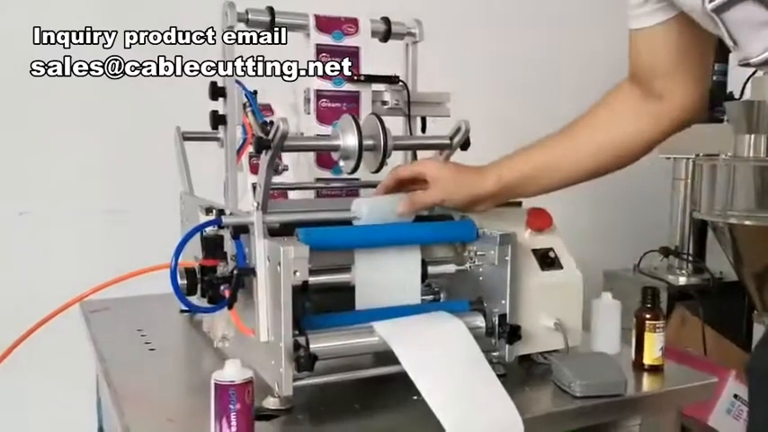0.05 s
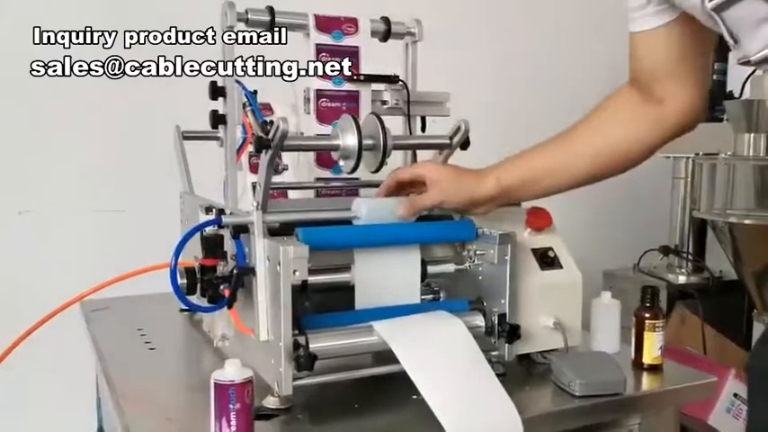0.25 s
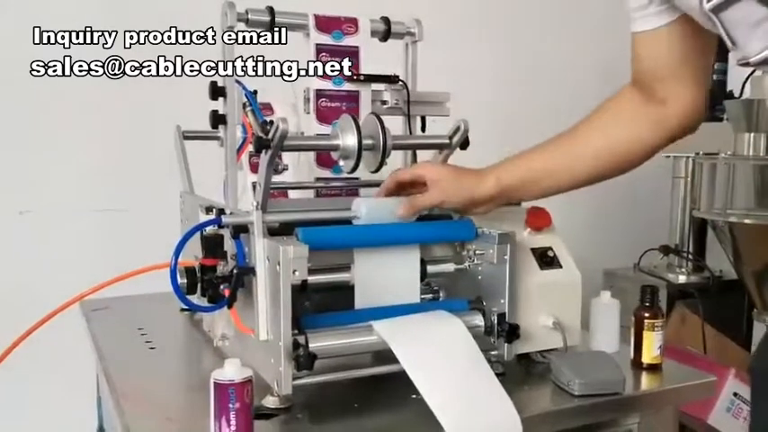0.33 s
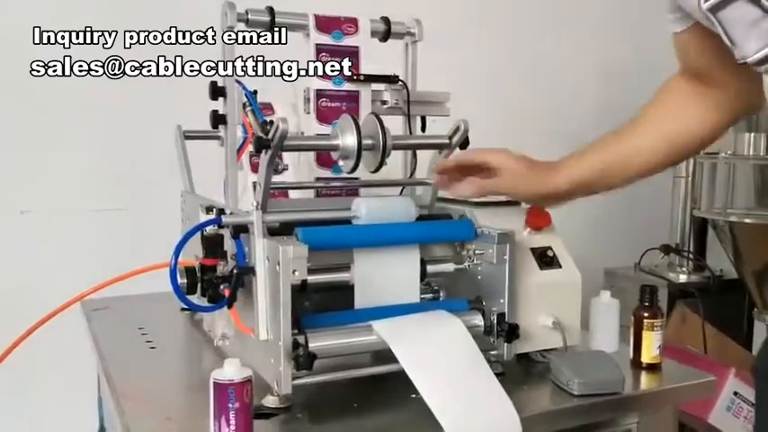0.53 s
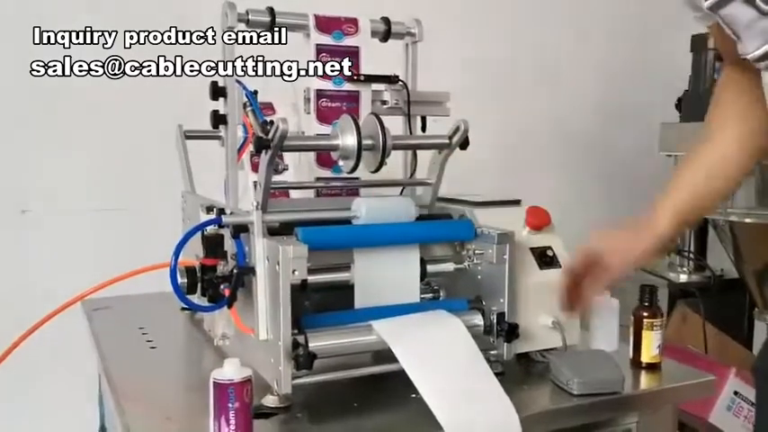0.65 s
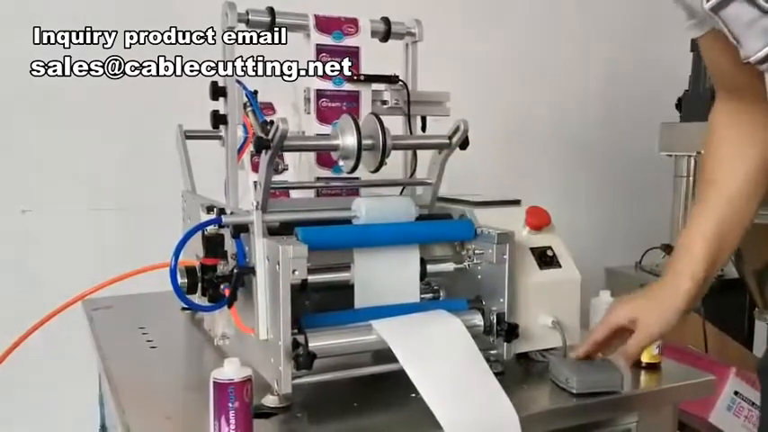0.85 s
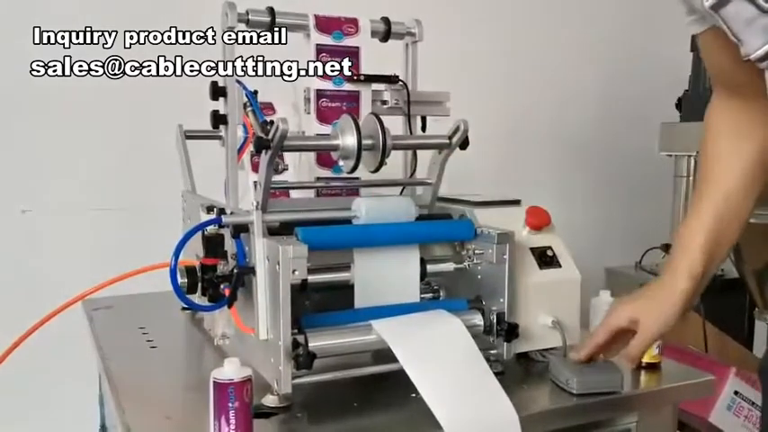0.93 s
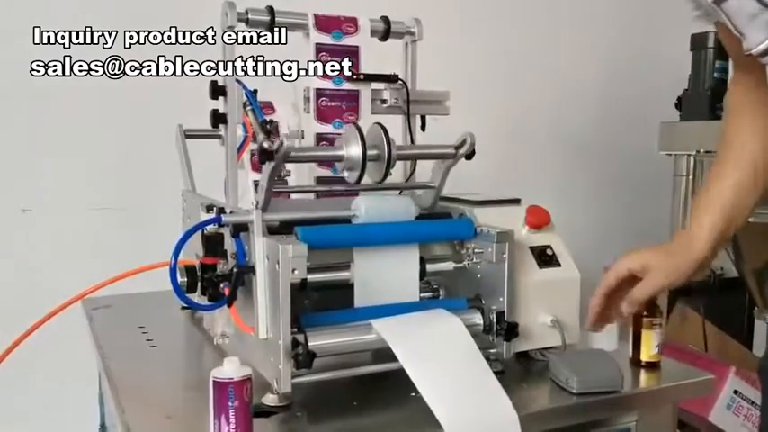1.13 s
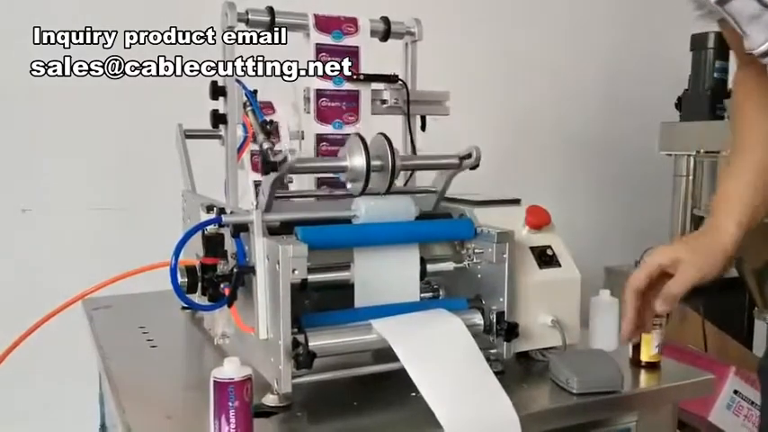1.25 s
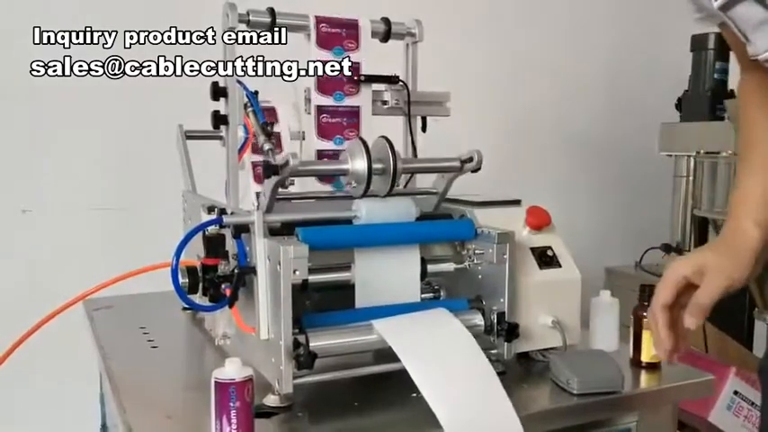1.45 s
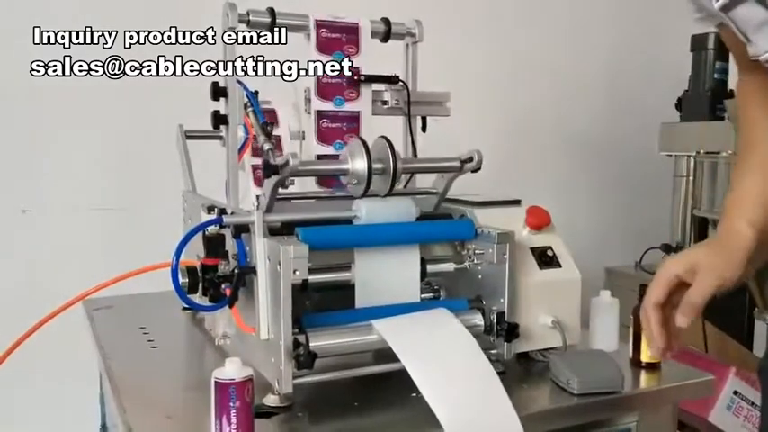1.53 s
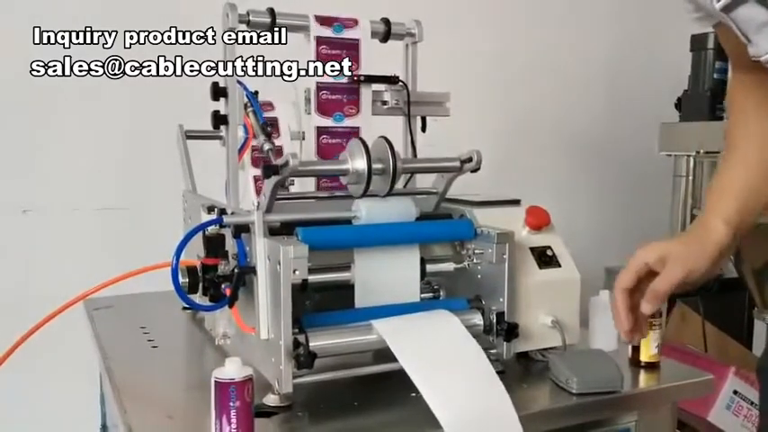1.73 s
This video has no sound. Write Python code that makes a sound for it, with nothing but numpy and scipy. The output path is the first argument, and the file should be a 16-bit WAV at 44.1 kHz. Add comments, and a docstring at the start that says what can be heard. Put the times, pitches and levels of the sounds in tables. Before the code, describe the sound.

A pneumatic tabletop labelling machine runs one cycle in a reverberant workshop with low, uneven motor hum. At about 0.2 s a switch ticks and a valve snaps, then air rushes in with a faint wavering note. At 0.43 s a latch double-ticks and exhaust hisses; at 0.47 s the arm clacks loudly, with ringing steel and dull rattle. Softer hiss fades from 0.7 s, ending in a hollow bump and puff near 1.2 s.

```python
"""An air-driven tabletop labelling machine in a hard-walled workshop, over room noise and an uneven motor hum.
A switch ticks (damped modes), a valve snaps over (modes and noise cracks) and air fills the cylinder (shaped
noise and a wavering note). Exhaust air hisses as the latch ticks; the arm clacks against its stop, and the
steel frame and table ring and rattle. A softer hiss follows and fades, with a hollow bump and a last puff."""
import sys
import numpy as np
from scipy import signal
from scipy.fft import rfft, irfft, next_fast_len
from scipy.io import wavfile
from scipy.ndimage import map_coordinates

SR = 44100
rng = np.random.default_rng(int(sys.argv[2]) if len(sys.argv) > 2 else 0)


def master_out(mix):
    """Clip the mix to full scale and print it as 16-bit PCM to the path in sys.argv[1]."""
    frames = np.transpose(np.atleast_2d(mix))
    ceiling = np.clip(frames, -1, 1)
    pcm = np.round(ceiling * 32767).astype(np.int16)
    wavfile.write(sys.argv[1], SR, pcm)


N = 79380  # samples

CROSSOVER_HZ = 800  # stereo differences and spectral ripple grow in gradually around here
FILL_START_S = 0.19  # air enters the cylinder


def amp(db):
    """A level in decibels is 20 times the logarithm of the amplitude ratio."""
    return 10 ** (np.asarray(db) / 20)


def unit(x):
    """Dividing by the root mean square gives a signal of rms 1."""
    return x / np.sqrt(np.mean(x ** 2) + 1e-20)


def along(points, hz):
    """(Hz, value) points are joined on a logarithmic frequency axis, close to the ear's pitch scale."""
    point_hz, value = np.transpose(points)
    return np.interp(np.log(hz + 1), np.log(point_hz + 1), value)


def since(start):
    """Seconds elapsed since start, held at zero before it."""
    return np.maximum(np.arange(N) / SR - start, 0)


def fade(t, t60):
    """Damping proportional to velocity gives an exponential decay: 60 dB in t60 seconds."""
    return np.exp(-np.log(1000) * t / np.maximum(t60, 1e-4))


def level(rows):
    """A slow level curve: gain per sample from (time [s], level [dB]) points."""
    return amp(np.interp(since(0), *np.transpose(rows)))


def pan(db):
    """Interchannel level difference: half is added on the left and half taken from the right."""
    return amp(np.array([db / 2, -db / 2])).reshape(2, -1)


def filtered(x, response):
    """Linear filtering: the spectrum of x is multiplied by a frequency response."""
    size = next_fast_len(N + SR // 2)
    return irfft(rfft(x, size) * response(np.fft.rfftfreq(size, 1 / SR)), size)[..., :N]


def noise(gain):
    """Partial coherence: independent mid and side noises, coloured by gain(Hz), set how alike the channels are."""
    # correlation of left and right: (frequency [Hz], correlation [1])
    coherence = [(60, .9988), (170, 1), (350, 0.99), (700, 0.94), (1300, 0.82), (2400, 0.53), (4500, 0.22),
                 (7000, 1), (8500, 0.78)]

    def mid_side_response(hz):
        angle = np.arccos(np.clip(along(coherence, hz), -1, 1)) / 2
        return gain(hz) * np.array([np.cos(angle), np.sin(angle)])

    mid, side = filtered(rng.standard_normal((2, N)), mid_side_response)
    return np.array([mid + side, mid - side])


def rush(colour):
    """Turbulence as stereo noise of rms 1, its (Hz, dB) spectrum rippled as by reflections off nearby plates."""
    ripple_db, ripple_step_hz = 4, 59.27
    knots = rng.standard_normal(1024)

    def gain(hz):
        ripple = map_coordinates(knots, [hz / ripple_step_hz], order=1, mode="wrap")
        return amp(along(colour, hz) + ripple_db * ripple * hz / (hz + CROSSOVER_HZ))

    return unit(noise(gain))


def hollow(centre_hz, width_hz):
    """A single resonance: stereo noise of rms 1 with a bell-shaped peak."""
    return unit(noise(lambda hz: 1 / (1 + ((hz - centre_hz) / width_hz) ** 2)))


def wobble(rate):
    """Slow random modulation: a smooth curve through rate random knots a second."""
    return map_coordinates(rng.standard_normal(512), [since(0) * rate], mode="wrap")


def ring(start, modes, fall_s=None):
    """Modal superposition: damped sines with wandering phase; pitch may sink, halving after fall_s."""
    attack_s, wander_rate, wander_rad = .0004, 43.8, 0.79  # rate in knots a second
    t, out = since(start), np.zeros(N)
    # the slope of this warped time falls to one half at fall_s
    warped_t = t if fall_s is None else fall_s * np.arctan(t / fall_s)
    for hz, db, t60 in modes:
        wander = map_coordinates(rng.standard_normal(512), [t * wander_rate], mode="wrap")
        phase = 2 * np.pi * hz * warped_t + wander_rad * (wander - wander[0])
        mode_db = db + rng.normal()  # each mode's level scatters by about 1 dB
        out += amp(mode_db) * fade(t, t60) * np.sin(phase)
    return out * (1 - np.exp(-t / attack_s))


def room(x):
    """Reverberation: convolution with a noise tail that decays at its own rate in each frequency band."""
    # reverberation time: (frequency [Hz], t60 [s])
    echo_t60 = [(200, 0.75), (2000, 0.88), (5000, 0.38), (9000, 0.62)]
    hz, t, bands = signal.stft(noise(np.ones_like)[:, :SR], SR, nperseg=256)
    decaying = bands * fade(t, along(echo_t60, hz)[:, None])
    tail = signal.istft(decaying, SR, nperseg=256)[1]
    return signal.fftconvolve(x, tail / np.linalg.norm(tail[0]), axes=1)[:, :N]


def contacts(hits, modes, pan_db):
    """Impact excitation: each metal contact gives a broadband crack, a brief modal ring and an echo."""
    # crack spectrum: (frequency [Hz], density [dB per Hz])
    crack_colour = [(300, -16), (900, -5), (1500, -14), (2500, -5), (5000, 3), (7500, -0.5), (9000, -7.5)]
    crack_t60, echo_db = 0.0096, 0
    out = np.zeros((2, N))
    for start, ring_db, crack_db in hits:
        t = since(start)
        crack = unit(noise(lambda hz: amp(along(crack_colour, hz))))
        crack = crack * (t > 0) * fade(t, crack_t60)
        out += amp(ring_db) * ring(start, modes) + amp(crack_db) * crack
    mono = out.mean(axis=0, keepdims=True)
    return out * pan(pan_db) + amp(echo_db) * room(mono)


def flow(start, end, attack, db, sag, release):
    """Pressure-driven flow: a linear opening, a steady change in dB (negative sag rises), decay after end."""
    t = since(start)
    opening = np.minimum(t / max(attack, 1e-4), 1)  # attacks below 0.1 ms, even negative, take 0.1 ms
    return amp(db - sag * t) * opening * fade(since(end), release)


def workshop():
    """Stationary broadband noise, and a low motor hum as a sine under a swelling and ebbing level."""
    # room noise spectrum: (frequency [Hz], density [dB per Hz])
    floor_colour = [(20, 1), (33, -0.5), (75, 2), (115, 5), (160, 2), (350, -1.5), (520, -3.5), (760, -0.5),
                    (1150, -8.5), (1500, -4), (1900, -8.5), (2800, -7.5), (3700, -19.5), (4700, -25.5),
                    (6200, -26.5), (7300, -20.5), (8100, -29.5), (8700, -34)]
    # room noise and hum levels: (time [s], level [dB])
    floor_level = [(0, -53.5), (.3, -51.5), (.8, -50.5), (1.3, -51), (1.8, -51.5)]
    hum_level = [(0, -54), (.13, -74.5), (.39, -50.5), (.55, -81), (.67, -47.5), (.79, -48), (.87, -77),
                 (1.17, -52.5), (1.4, -61.5), (1.65, -51.5), (1.74, -72), (1.8, -59)]
    hum_hz = 49.3
    hum = np.sqrt(2) * np.sin(2 * np.pi * hum_hz * since(0))
    return level(floor_level) * rush(floor_colour) + level(hum_level) * hum


def switch():
    """Free vibration: the switch ticks as a set of mostly short damped modes, towards the right."""
    # ring of the switch: (frequency [Hz], level [dB], t60 [s])
    tick_modes = [(5320, -0.5, 0.026), (5240, -7, 0.0079), (6400, -6, 0.014), (7860, -22, 0.11),
                  (3010, -16, 0.087)]
    start_s, level_db, pan_db = .1855, -30.5, -5.5  # pan is left minus right
    return amp(level_db) * ring(start_s, tick_modes) * pan(pan_db)


def valve():
    """Impact and resonance: the valve body rings as its spool snaps over in three contacts."""
    # ring of the valve body, then of the spool: (frequency [Hz], level [dB], t60 [s])
    body_modes = [(1034, 1, 0.1), (2110, -14.5, 0.16), (2280, -3.5, 0.13), (2480, -16.5, 0.15),
                  (3160, 2, 0.049)]
    spool_modes = [(2310, -9, 0.021), (2470, -2.5, 0.019), (4306, 3.5, 0.013), (5380, 1.5, .018),
                   (6090, -6.5, 0.013), (8230, -5, 0.019)]
    # spool contacts: (time [s], ring level [dB], crack level [dB])
    spool_hits = [(.2028, -43, -29), (.2213, -25.5, -28), (.2238, -28.5, -27)]
    stroke_s, body_db, spool_pan_db = .2027, -36, -1
    return amp(body_db) * ring(stroke_s, body_modes) + contacts(spool_hits, spool_modes, spool_pan_db)


def air_line_note():
    """Resonance: while the cylinder fills, the air line sings a wavering tone in a band of breathy noise."""
    # flow shape: (attack [s], level [dB], sag [dB per s], release t60 [s])
    note_shape = (0.17, -49.5, 8, .5)
    note_hz, width_hz, end_s = 1028, 160, .46
    waver_rad, flutter_db, wobble_rate = 1, 4, 40.3  # rate in knots a second
    breath_db = 3  # relative to the tone
    phase = 2 * np.pi * note_hz * since(0) + waver_rad * wobble(wobble_rate)
    tone = np.sqrt(2) * np.sin(phase) * amp(flutter_db * wobble(wobble_rate))
    breath = amp(breath_db) * hollow(note_hz, width_hz)
    return (tone + breath) * flow(FILL_START_S, end_s, *note_shape)


def filling():
    """Turbulent inflow: coloured noise swells as air fills the cylinder, then sags with the pressure."""
    # flow shape: (attack [s], level [dB], sag [dB per s], release t60 [s])
    fill_shape = (0.14, -37.5, 50, 9.5)
    # spectrum: (frequency [Hz], density [dB per Hz])
    fill_colour = [(300, -37), (1600, -10.5), (2100, 8), (2600, 8.5), (3450, -12.5), (3900, 8), (4350, 0),
                   (4750, -1.5), (5850, 4), (6500, -8), (7300, -7.5), (8200, -5), (9000, -26)]
    end_s = .43
    return flow(FILL_START_S, end_s, *fill_shape) * rush(fill_colour)


def latch():
    """Impact excitation: the latch lets go with a tight double tick, towards the right."""
    # contacts: (time [s], ring level [dB], crack level [dB])
    latch_hits = [(.4301, -32, -24), (.433, -31.5, -26)]
    # ring of the latch: (frequency [Hz], level [dB], t60 [s])
    latch_modes = [(2482, -1, 0.025), (3860, -4, .01), (4780, -1, .008), (6060, 3.5, 0.018),
                   (7270, -8.5, 0.015)]
    return contacts(latch_hits, latch_modes, pan_db=-5)


def exhaust():
    """Turbulent outflow: exhaust noise starts at once, sags with the pressure and then dies away faster."""
    # flow shape: (attack [s], level [dB], sag [dB per s], release t60 [s])
    exhaust_shape = (-0.0447, -33, 27, 0.49)
    # spectrum: (frequency [Hz], density [dB per Hz])
    exhaust_colour = [(500, -28), (1700, -17), (2150, -0.5), (2650, 2.5), (3200, -0.5), (3900, 0),
                      (4750, -7.5), (5800, 1.5), (6500, -3), (7150, 3.5), (8000, -5.5), (9000, -27)]
    start_s, end_s = .428, 0.7165
    return flow(start_s, end_s, *exhaust_shape) * rush(exhaust_colour)


def soft_hiss():
    """Weak turbulence: a softer hiss fades as a hollow, resonant bump and an abrupt last puff are heard."""
    # flow shapes: (attack [s], level [dB], sag [dB per s], release t60 [s])
    hiss_shape = (0.03, -48.5, 5.5, 2)
    bump_shape = (-0.4, -51, 0, -0.8)
    puff_shape = (-0.1, -47.5, -2, -0.13)
    # spectrum of hiss and puff: (frequency [Hz], density [dB per Hz])
    hiss_colour = [(300, -13), (1000, -8), (1600, 0), (2600, 4), (3400, 0), (4400, -4.5), (5700, -1.5),
                   (6400, -1.5), (7400, 3.5), (8000, -1.5), (9000, -9.5)]
    hiss_start_s, hiss_end_s = 0.726, 1.132
    bump_start_s, bump_end_s = 1.165, 1.207
    puff_start_s, puff_end_s = 1.185, 1.225
    hiss = flow(hiss_start_s, hiss_end_s, *hiss_shape) * rush(hiss_colour)
    bump = flow(bump_start_s, bump_end_s, *bump_shape) * hollow(centre_hz=1640, width_hz=180)
    puff = flow(puff_start_s, puff_end_s, *puff_shape) * rush(hiss_colour)
    return hiss + bump + puff


def arm_stop():
    """Impact and modal response: the arm clacks on its stop; frame and table ring, and loose parts rattle."""
    # arm contacts: (time [s], ring level [dB], crack level [dB])
    arm_hits = [(.465, -28.5, -21), (.467, -29, -19.5), (.4698, -34.5, -26)]
    # rings of arm, dull thud, table, frame and sinking groan: (frequency [Hz], level [dB], t60 [s])
    arm_modes = [(2805, -14.5, 0.042), (5730, 4, .02), (6230, -1, .02), (6920, -1.5, 0.019),
                 (7550, -5, 0.01)]
    thud_modes = [(153, -11, 0.035), (220, -3.5, 0.05), (348, -8, 0.031), (472, 0, 0.037)]
    table_modes = [(113.1, -6.5, 3.3), (177.5, -5, 0.54), (209.3, -6.5, 0.9), (346, -4.5, 0.38),
                   (398, -4.5, 0.7), (1023, -2.5, 0.18)]
    frame_modes = [(2630, 0, 0.7), (2870, 1, 0.14), (3670, 1, 0.54), (4150, 12, 0.17), (5730, 6, 0.34),
                   (6200, 2.5, 0.22), (6600, 3, .25), (7015, 1, 0.21), (7130, -2, 0.55)]
    groan_modes = [(733, -38, 0.87), (977, -42, 0.57)]
    # rattle spectrum: (frequency [Hz], density [dB per Hz])
    rattle_colour = [(70, -23), (135, -4.5), (200, -0.5), (410, -0.5), (570, -4), (725, -2.5), (840, -4),
                     (1000, -3.5), (1350, -12.5), (2500, -26)]
    stop_s, body_db, thud_db = .4645, -43, -37.5
    push_s, push_db = 0.00068, -33
    groan_fall_s, groan_swell_s = .75, 0.0096
    rattle_db, rattle_t60, rattle_swell_s = -36.5, 1.24, 0.039

    t = since(stop_s)
    clack = contacts(arm_hits, arm_modes, pan_db=0)
    # the push is one short pulse with a dip on either side
    u = (since(0) - stop_s) / push_s - 1
    push = amp(push_db) * (1 - u ** 2) * np.exp(-u ** 2 / 2)
    thud = amp(thud_db) * ring(stop_s, thud_modes)
    body = amp(body_db) * (ring(stop_s, table_modes) + ring(stop_s, frame_modes))
    groan = ring(stop_s, groan_modes, groan_fall_s) * (1 - np.exp(-t / groan_swell_s))
    rattle_envelope = (1 - np.exp(-t / rattle_swell_s)) * fade(t, rattle_t60)
    rattle = amp(rattle_db) * rush(rattle_colour) * rattle_envelope
    return clack + push + thud + body + groan + rattle


def scene():
    """Linear superposition: the machine's cycle adds to the workshop's sound."""
    air = air_line_note() + filling() + exhaust() + soft_hiss()
    return workshop() + switch() + valve() + latch() + air + arm_stop()


def record(dry):
    """Two-microphone pickup: level and phase differ above the bass; the treble rolls off to a band limit."""
    # level difference above the bass: (frequency [Hz], left minus right [dB])
    balance = [(1100, 0.5), (1700, 4.5), (2300, 8.5), (2900, 9), (3600, -0.5), (5000, -10), (6200, -2),
               (6900, 1.5), (8500, -5)]
    # phase difference above the bass: (frequency [Hz], lead of the left [rad])
    phase_lead = [(1800, 0.5), (2670, -1.4), (3360, -2.5), (5000, -2.5), (5800, 0)]
    # treble response: (frequency [Hz], gain [dB])
    roll_off = [(7900, 0), (8400, -6), (8800, -8), (9500, -23)]
    top_hz = 9700

    def response(hz):
        above_bass = hz ** 2 / (hz ** 2 + CROSSOVER_HZ ** 2)
        sides = pan(along(balance, hz) * above_bass)
        sides = sides / np.sqrt(np.mean(sides ** 2, axis=0))  # mean power of the pair stays 1
        # each side turns by half the lead, in opposite directions
        turn = np.exp(.5j * along(phase_lead, hz) * above_bass * np.array([[1], [-1]]))
        return turn * sides * amp(along(roll_off, hz)) * (hz < top_hz)

    return filtered(dry, response)


dry = scene()
out = record(dry)
master_out(out)
```